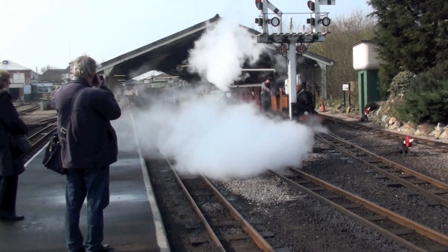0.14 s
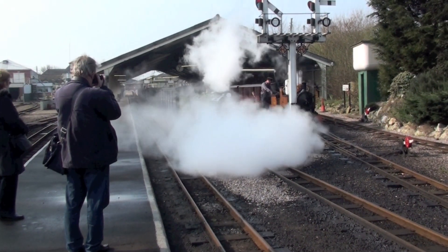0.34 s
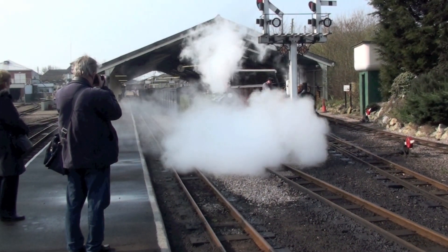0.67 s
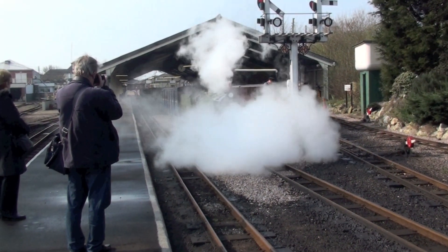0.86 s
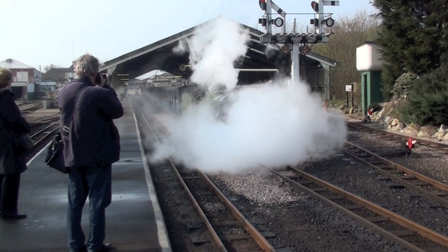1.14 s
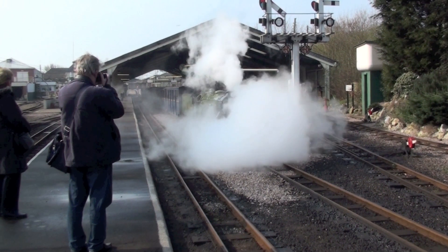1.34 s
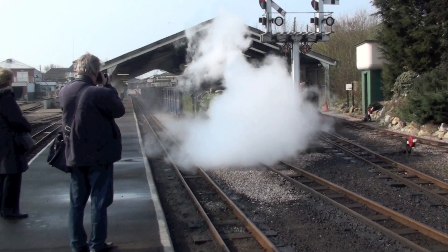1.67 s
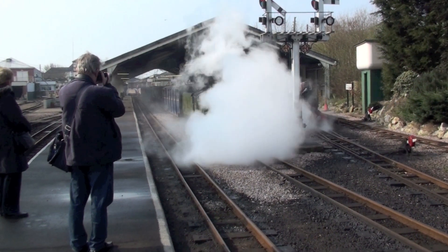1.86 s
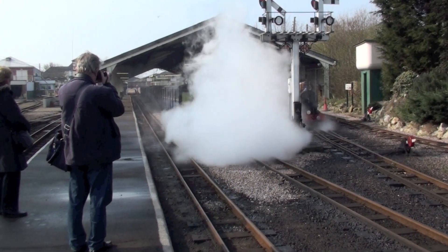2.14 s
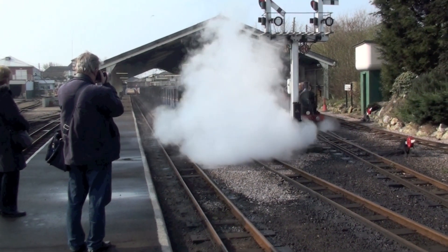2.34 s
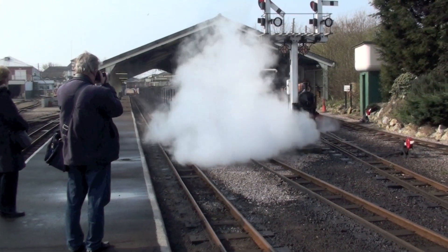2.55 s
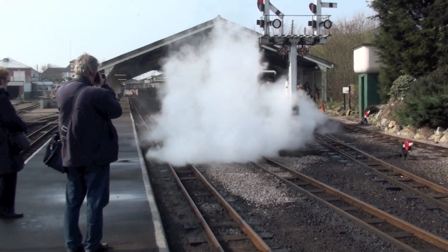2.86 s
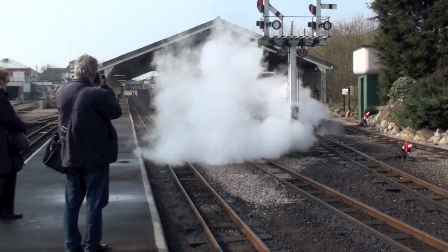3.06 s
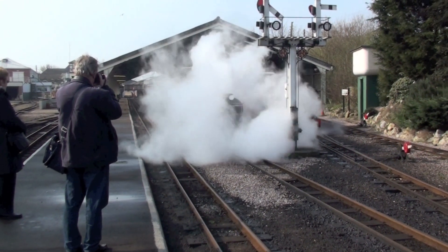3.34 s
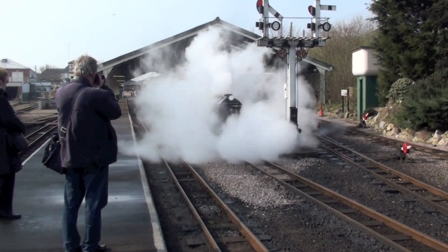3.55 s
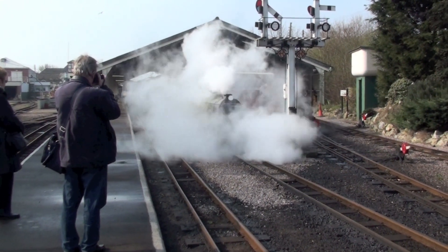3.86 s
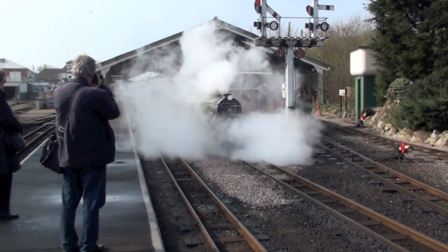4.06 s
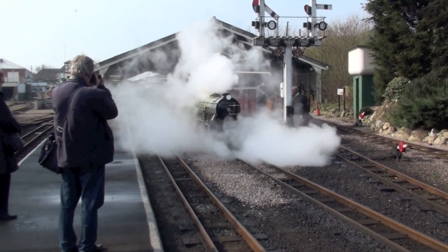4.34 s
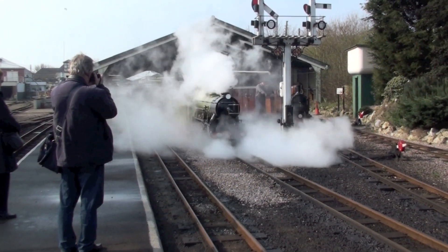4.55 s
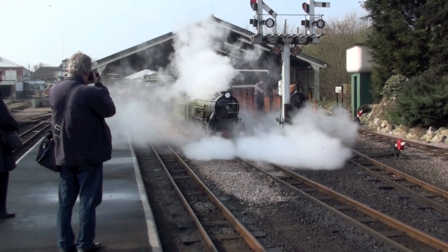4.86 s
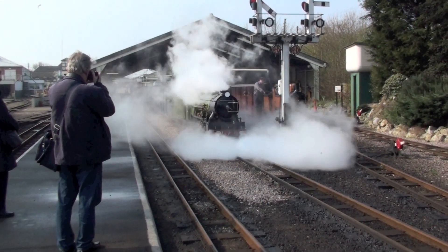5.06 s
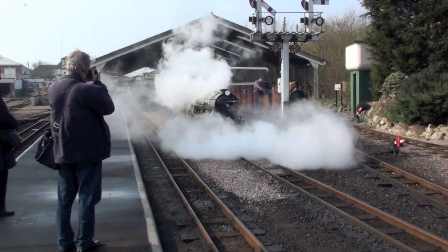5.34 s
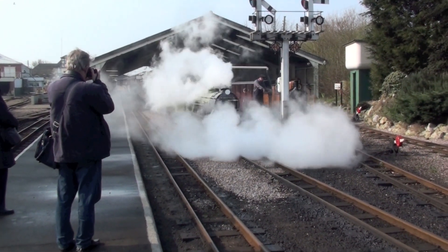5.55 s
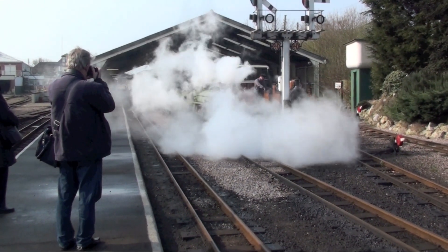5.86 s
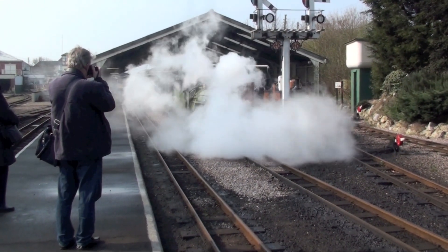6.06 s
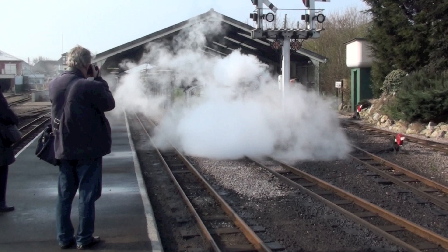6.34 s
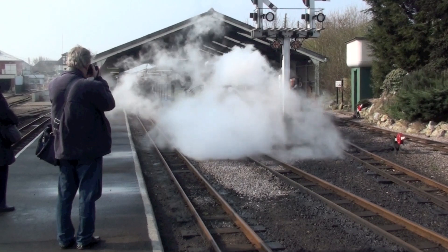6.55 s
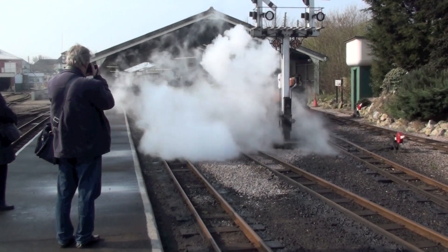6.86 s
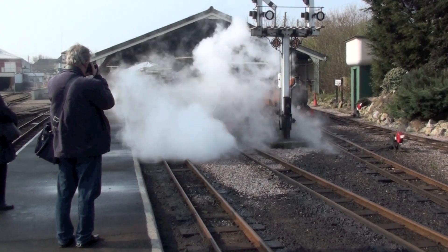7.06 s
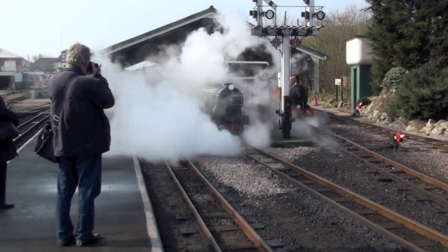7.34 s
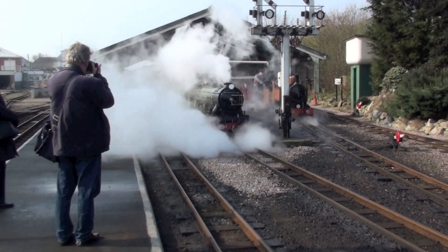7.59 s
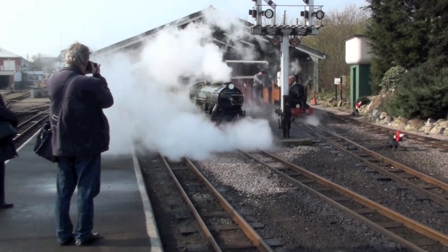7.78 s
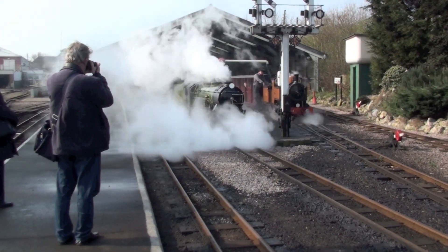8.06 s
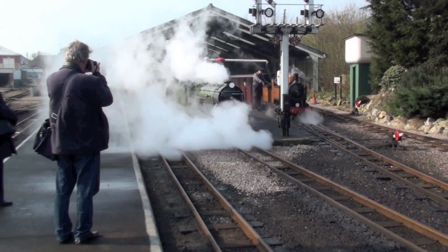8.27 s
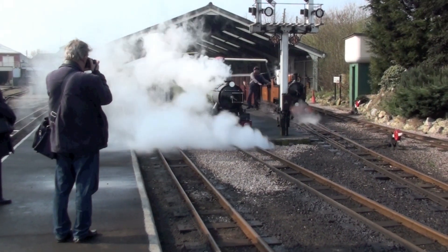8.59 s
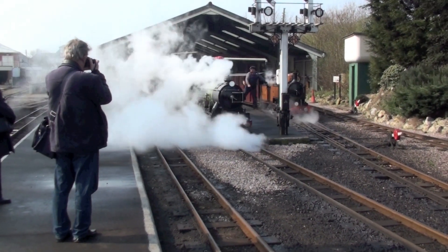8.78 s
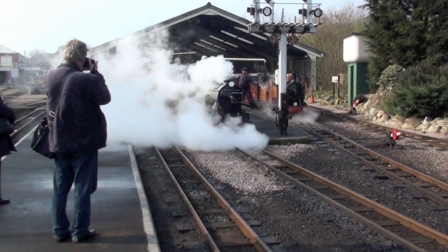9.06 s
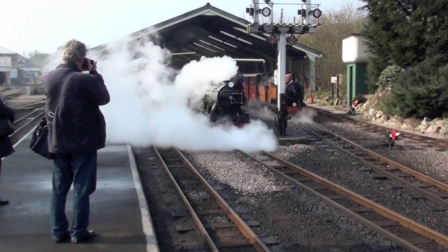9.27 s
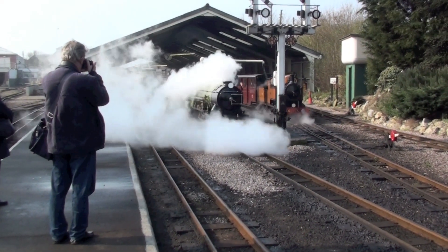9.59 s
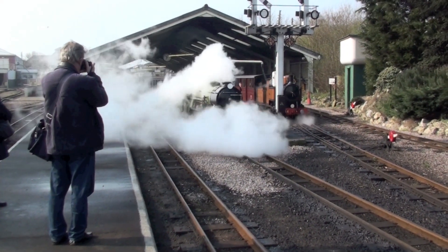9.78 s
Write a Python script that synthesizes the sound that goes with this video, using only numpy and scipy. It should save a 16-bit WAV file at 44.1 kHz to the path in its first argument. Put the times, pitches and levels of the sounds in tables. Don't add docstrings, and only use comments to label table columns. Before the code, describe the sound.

A small steam locomotive vents from its drain cocks at a station platform: an unbroken, wide-band wet hiss, already running at the start and still going at the end. It thickens and brightens from about two seconds, flutters as cloud drifts, and carries hollow pipe resonances and a low chimney roar. Very short echoes come from wet ground and posts. Light wind rumbles on the stereo microphone a few metres away.

```python
import sys
import numpy as np
from scipy import signal
from scipy.io import wavfile

SR = 44100
rng = np.random.default_rng(int(sys.argv[2]) if len(sys.argv) > 2 else 0)


def unload_audio(sound):
    columns = np.transpose(np.atleast_2d(sound))
    steps = np.round(np.clip(columns, -1, 1) * 32767)
    wavfile.write(sys.argv[1], SR, steps.astype(np.int16))


def gain_from_db(level_db):
    decades = np.asarray(level_db, float) / 20
    return 10 ** decades


N = 437472
SLOW = np.arange(N // 40 + 2) * 40 / SR

ZONES_HZ = [800, 1700, 3200, 6800, 12000]
# pitch in Hz, level in dB per Hz.
JET_COLOUR = [(120, -39), (200, -20.5), (267, -15.5), (371, -17.5), (766, -13.5), (1020, -17.5),
              (1580, -11.5), (1830, -11.5), (2580, -8), (2990, -5.5), (3390, -4), (4220, -3.5), (8260, -2),
              (11900, -6.5), (15300, -16)]
# time in seconds, level in dB.
BLOWER = [(0, -39.5), (.5, -38.5), (1.1, -35.5), (1.6, -39.5), (2.0, -46), (2.6, -43.5), (3.1, -43),
          (3.7, -45.5), (4.1, -50), (4.6, -47.5), (5.3, -45.5), (6.2, -45.5), (6.9, -40.5), (7.6, -35),
          (8.2, -38.5), (8.8, -41.5), (9.4, -41.5), (9.92, -40.5)]
# time in seconds, pressure in dB, wetness in dB.
COCKS = [(0, -26, 4.5), (.75, -25, 1.5), (1.0, -25, -0.5), (1.4, -23.5, 0), (2.1, -19.5, -2.5),
         (2.7, -19.5, -0.5), (3.1, -20, -1.5), (3.7, -20.5, 0.5), (4.05, -20.5, -2.5), (4.9, -19.5, -2.5),
         (5.3, -22, -0.5), (6.0, -22, -4), (6.7, -24, 0), (7.2, -24.5, -1.5), (7.7, -21.5, -2),
         (8.2, -23, 0.5), (9.0, -24, 1), (9.92, -22.5, -2.5)]
# time in seconds, side minus mid in dB.
SPREAD = [(0, -13.5), (1.1, -11.5), (1.9, -18), (3.5, -19), (5.1, -18.5), (6.2, -16), (7.1, -13),
          (7.7, -17.5), (9.1, -18), (9.6, -14.5), (9.92, -15.5)]
# pitch in Hz, side level added in dB, share of the spread's swing.
SIDE_TILT = [(300, -4, .5), (700, -4, 0.2), (1320, -1.5, 0.3), (2380, -15, .8), (3800, -4, 1.5),
             (4740, 3, 1.5), (5600, -5.5, 3.1), (6700, 4.5, 1), (7800, -4.5, 0.4), (8700, 3, 0.16),
             (11000, 6.5, 0.68), (13000, 6.5, 0.67), (15000, -1, .7)]
# centre in seconds, length in seconds, loss in dB, # pitch in Hz, reach
HISS_DIPS = [(.12, 1.4, 11, 1140, 0.13), (2.27, 0.17, 3, 650, 2.6), (2.3, 0.9, 8, 1050, 0.13),
             (2.6, 0.37, 3, 12000, 0.63), (2.78, 0.11, 1, 4500, 1.3), (3.28, 0.16, 4.5, 1300, 2.6),
             (3.865, 0.052, 6.5, 2200, 1.3), (3.98, 0.067, 3.5, 2200, 1.4), (4.17, 0.27, 1, 600, 2.1),
             (4.5, .12, 2, 2800, 1.7), (5.68, 0.2, 4.5, 4290, 0.41), (6.5, 1.8, 2, 10300, 0.31),
             (5.19, 0.48, 6.5, 5600, 1.2), (5.45, .07, 5, 6500, 0.69), (5.57, 0.13, 5.5, 6500, 0.72),
             (5.94, .1, 6, 7000, 1.4), (6.27, .26, 4, 7600, 1.7), (6.56, .09, 4, 6560, 1.1),
             (6.93, 0.38, 3.5, 4000, 1.7), (8.01, 0.15, 10.5, 800, 1.1), (8.33, 0.032, 4, 900, 2.2),
             (8.72, .1, 5.5, 4300, 0.67), (8.83, 0.094, 8, 3000, 1.1), (3.58, 0.2, -1, 8500, 0.56)]
# centre in seconds, length in seconds, gain in dB,
# pitch in Hz, reach in octaves.
SLUGS = [(.64, .1, 2, 2500, 1), (2.52, .1, 2, 2300, 1.1), (3.14, 0.17, 3.5, 3200, 1),
         (3.8, 0.22, 3, 4470, 0.55), (4.45, 0.11, 1, 13000, 0.32), (5.38, 0.18, 3, 9000, 1),
         (7.47, 0.12, 4.5, 890, 1.5), (8.38, 0.098, 3.5, 2130, 1.3), (8.96, 0.087, 2.5, 2580, 0.74),
         (9.09, 0.041, 3.5, 3800, 1.2), (9.45, 0.45, 4.5, 1500, 0.64), (9.86, 0.091, 6.5, 600, 1.5),
         (.28, 0.22, 5, 7660, 0.23), (4.6, 0.23, 3, 9900, 0.5), (8.76, 0.27, 3.5, 8850, 0.46),
         (9.64, .15, 1.5, 6550, .5), (1.42, 0.3, 3, 6370, 0.31), (3.3, 0.11, 3, 7800, 0.44),
         (2.99, 0.15, 4, 4300, 0.3), (1.15, 0.43, 1, 4270, 0.27), (6.4, 0.26, 1, 5760, 0.36),
         (7.3, 0.55, 2.5, 2630, .15), (7.7, 0.078, 3, 4500, 0.44)]
# pitch in Hz, width in Hz, gain over the noise in dB.
PIPE_NOTES = [(765, 96, -11.5), (2080, 1540, -19), (2860, 570, -20.5), (4020, 1800, -17), (3630, 340, -13),
              (4370, 380, -13), (3210, 110, -23), (5420, 270, -7), (7970, 740, -18)]
# centre in seconds, length in seconds, gain in dB.
PIPE_SWELLS = [
    [(.15, 1.1, 14), (1.2, 2.3, 11), (7.0, 0.51, 12), (7.7, .4, 8), (9.88, 0.17, 9)],
    [(.2, 0.54, 14), (.75, .4, 13), (6.75, 0.26, 8), (7.55, 0.17, 11), (8.95, .3, 10), (9.4, 0.28, 7)],
    [(.3, 1.0, 4), (1.6, .7, 8), (6.65, 0.42, 8), (8.1, 0.71, 16), (8.95, 0.67, 17), (9.45, 0.52, 17)],
    [(3.1, 0.19, 7), (3.55, 0.49, 15), (4.4, 1, 3), (7.7, 0.46, 0)],
    [(2.95, 0.35, 4), (8.05, 0.36, 5), (9.5, .6, 13)],
    [(.25, 0.78, 12), (7.9, 0.36, 16), (6.4, 0.58, 2)],
    [(.41, 1.0, 24), (6.4, .9, 23.5)],
    [(.35, .7, 5), (2.1, .6, 5), (6.1, 0.68, 10)],
    [(2.3, 1.2, 2), (6.0, 1.3, 10), (7.6, 1.2, 12), (8.8, .8, 13)],
]
# delay in ms, strength, upper limit in Hz.
ECHOES = [(1.314, 0.14, 4500), (0.36, 0.054, 20000), (0.96, 0.066, 13000)]
# time in seconds, delay in ms, strength.
PLATFORM = [(0, 1, 0.048), (.7, 0.98, .14), (1.0, 0.75, 0.028), (1.8, 1, .03), (2.4, .97, 0.066),
            (3.2, .97, 0.0051), (5.6, 0.77, 0.024), (6.1, 0.85, 0.15), (6.95, 1, 0.1), (7.5, 0.86, 0.041),
            (8.8, 0.89, 0.046), (9.92, 0.98, 0.093)]
# start in seconds, length in seconds, from Hz, to Hz, strength.
CLOUD_EDGES = [
    (4.46, .38, 4000, 12200, .5),
    (2.8, .32, 6000, 11500, .35),
    (5.1, .25, 3500, 6000, .15),
    (3.36, .45, 5600, 10500, .27),
    (1.62, .2, 7500, 10500, .2),
]
# time in seconds, left minus right in dB.
LEAN = [(0.0, 1), (0.85, 0.0), (4.83, -0.5), (6.35, 0.5), (9.92, -1.0)]
# time in seconds, level in dB.
BREEZE = [(0, -39.5), (.4, -47), (.8, -53), (1.1, -41), (1.5, -40), (1.85, -44), (2.25, -59), (2.8, -55.5),
          (3.5, -59), (4.15, -60), (4.6, -59), (5.35, -51), (5.55, -45), (6.6, -44), (7.7, -45), (8.5, -52),
          (9.3, -44), (9.92, -38)]
# centre in seconds, length in seconds, change in dB.
GUSTS = [(.53, .08, -10), (.63, 0.065, 7), (.82, 0.13, -8), (1.138, 0.054, -9), (1.493, 0.12, 4),
         (1.69, 0.067, -8), (1.796, 0.09, 3), (2.42, .1, 4), (2.65, .05, -9), (2.877, 0.072, 8),
         (3.287, .1, -12), (4.14, .1, -6), (4.417, .1, 7), (5.82, .07, 6.5), (5.43, .07, -6), (5.5, .06, 9),
         (5.675, 0.064, 12.5), (7.07, .08, 4), (7.24, 0.13, -7), (7.71, .05, 7), (8.01, 0.13, -12),
         (8.21, 0.072, 4), (8.287, .06, 0), (8.59, 0.055, 13.5), (8.793, .1, -8), (9.09, .06, 8),
         (9.155, .06, -13), (9.345, .1, 7), (9.553, 0.13, -10), (9.83, 0.12, 7)]
# pitch in Hz, level in dB per Hz.
WIND_COLOUR = [(12, -20), (20, -1.5), (54, -1), (128, 0), (250, -3.5), (330, -7.5), (450, -16), (900, -18)]
# pitch in Hz, side minus mid in dB.
WIND_SIDE = [(25, -14), (60, -5), (130, -5.5), (250, -5), (600, -11)]
# centre in seconds, peak in dB, pitch in Hz.
BUFFETS = [
    (5.676, -18.5, 140),
    (5.683, -27, 45),
    (5.2, -37, 380),
]


def in_time(rows):
    s, *columns = np.transpose(rows)
    return [np.interp(SLOW, s, c) for c in columns]


def full(control):
    return np.interp(np.arange(N) / SR, SLOW, control)


def at_hz(points, hz):
    points = np.array(points)
    return np.interp(np.log(hz), np.log(points[:, 0]), points[:, 1])


def drift(rate):
    r = np.exp(-80 * np.pi * rate / SR)
    white = rng.standard_normal(N // 40 + 4002)
    slow = signal.lfilter([1], [1, -2 * r, r * r], white)[4000:]
    slow = slow - slow.mean()
    return slow / np.sqrt(np.mean(slow ** 2) + 1e-20)


def swells(rows):
    s, length = np.array(rows)[:, :1], np.array(rows)[:, 1:2]
    return np.exp(-np.minimum((2 * (SLOW - s) / length) ** 2, 50))


def passing_db(rows, hz):
    _, _, size_db, centre_hz, octaves = np.transpose(rows)
    reach = np.exp(-(np.log2(hz / centre_hz) / octaves) ** 2)
    return (size_db * reach) @ swells(rows)


def bands(low_hz, high_hz, count):
    edges = np.geomspace(low_hz, high_hz, count + 1)
    white = rng.standard_normal((2, 2, N))
    for k, (low, high) in enumerate(zip(edges, edges[1:])):
        band = signal.butter(2, [low, high], "band", fs=SR, output="sos")
        yield np.sqrt(low * high), signal.sosfilt(band, white[k % 2])


def jets(slow_db, fast_db, shared_db):
    roar, hiss, wet = [c - c.mean() for c in in_time(BLOWER) + in_time(COCKS)]
    body = 0.71 * hiss + 1.0 * wet
    sizzle = 0.18 * hiss + 0.16 * wet
    zones = [roar, 0.29 * roar + 0.64 * body, body, hiss, sizzle]
    spread = in_time(SPREAD)[0]
    swing = spread - spread.mean()
    gust, near, out = drift(8.6), drift(3.2), 0
    for hz, (mid, side) in bands(170, 16200, count=36):
        place = np.interp(np.log(hz), np.log(ZONES_HZ), np.arange(5))
        k = min(int(place), 3)
        flow = zones[k] + (place - k) * (zones[k + 1] - zones[k])
        flow = flow + passing_db(SLUGS, hz) - passing_db(HISS_DIPS, hz)
        near = 0.41 * near + 0.86 * drift(3.0)
        quick = fast_db * drift(12.3) + shared_db * gust
        flicker = slow_db * near + quick * (hz / 8000) ** 0.28
        swing_share = at_hz(np.array(SIDE_TILT)[:, ::2], hz)
        width_db = -15 + at_hz(SIDE_TILT, hz) + swing_share * swing + 2.0 * drift(3.3)
        gain_db = at_hz(JET_COLOUR, hz) + flow + flicker
        out = out + np.array([mid * full(gain_from_db(gain_db)), side * full(gain_from_db(gain_db + width_db))])
    out = pipes(out)
    return gain_from_db(-18.0) * out / np.sqrt(np.mean(out[0] ** 2))


def resonance(x, hz, width):
    r = np.exp(-np.pi * width / SR)
    feedback = [1, -2 * r * np.cos(2 * np.pi * hz / SR), r * r]
    return signal.lfilter(np.array([1, 0, -1]) * (1 - r * r) / 2, feedback, x)


def pipes(x):
    out = x
    for (hz, width, gain_db), rows in zip(PIPE_NOTES, PIPE_SWELLS):
        note = resonance(resonance(x, hz, width), hz, width)
        swell = gain_from_db(gain_db + np.array(rows)[:, 2]) @ swells(rows)
        out = out + full(swell) * note
    return out


def delayed(x, ms):
    now = np.arange(N)
    return np.array([np.interp(now - ms * SR / 1000, now, c) for c in x])


def yard(x):
    out, now = x.copy(), np.arange(N) / SR
    for ms, strength, cut_hz in ECHOES:
        dull = signal.sosfilt(signal.butter(2, cut_hz, fs=SR, output="sos"), x)
        out += strength * full(gain_from_db(0.43 * drift(0.96))) * delayed(dull, ms)
    platform_ms, mirror = map(full, in_time(PLATFORM))
    out += mirror * delayed(x, platform_ms)
    for ms in (.6, 1.15, 1.7, 2.3, 3.1, 4.3):
        out += 0.085 * full(drift(0.84)) * delayed(x, ms * full(1 + .02 * drift(0.53)))
    for s, length, from_hz, to_hz, strength in CLOUD_EDGES:
        gone = np.clip((now - s) / length, 0, 1)
        notch_hz = from_hz + gone * (to_hz - from_hz)
        echo = strength * np.sin(np.pi * gone)
        out = (out + echo * delayed(out, 500 / notch_hz)) / np.sqrt(1 + echo)
    return out


def wind():
    gust_db = in_time(BREEZE)[0] + np.array(GUSTS)[:, 2] @ swells(GUSTS)
    lumps, out = drift(16), 0
    for hz, (mid, side) in bands(18, 1000, count=11):
        bright = 0.051 * (gust_db + 43) * np.log2(hz / 120)
        gain = gain_from_db(at_hz(WIND_COLOUR, hz) + 1.75 * lumps + 1.6 * drift(4.2) + bright)
        out = out + full(gain) * np.array([mid, side * gain_from_db(at_hz(WIND_SIDE, hz))])
    out = full(gain_from_db(gust_db + 2.0)) * out / np.sqrt(np.mean(out[0] ** 2))
    return out + buffets()


def buffets():
    out = np.zeros((2, N))
    for s, peak_db, hz in BUFFETS:
        turn = 2 * np.pi * hz * (np.arange(N) / SR - s)
        bell = np.exp(-np.minimum((turn / 2.1) ** 2, 50))
        phase = 2.6 * (hz < 80)
        out += gain_from_db(peak_db) * np.outer([1, .4], np.cos(turn + phase) * bell)
    return out


def scene():
    mid, side = yard(jets(slow_db=1.0, fast_db=1.31, shared_db=0.19))
    side = side + mid * full(in_time(LEAN)[0]) * np.log(10) / 40
    mid, side = np.array([mid, side]) + wind()
    return np.array([mid + side, mid - side])


def low_pass(x):
    return signal.sosfilt(signal.butter(12, 15850, fs=SR, output="sos"), x)


def record(dry):
    mix = 0.93 * np.tanh(dry / 0.97)
    return low_pass(mix)


dry = scene()
out = record(dry)
unload_audio(out)
```